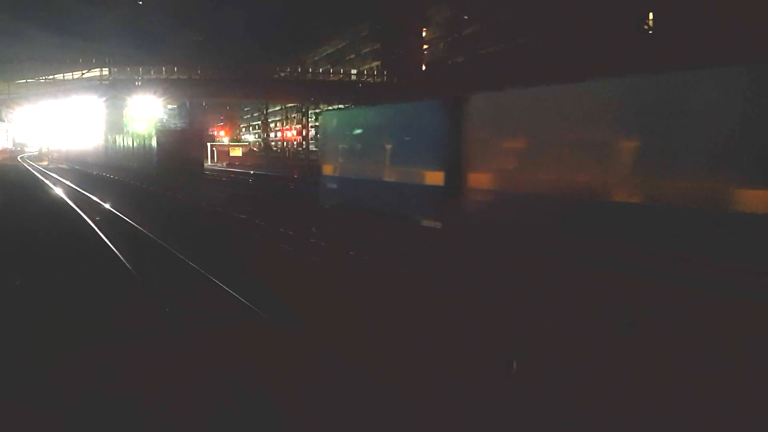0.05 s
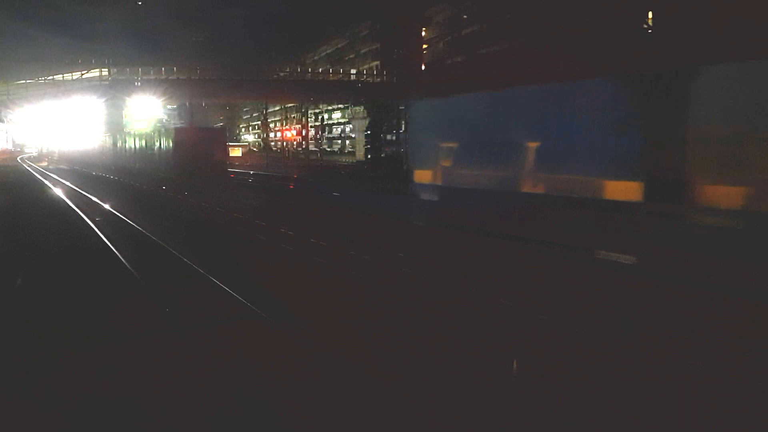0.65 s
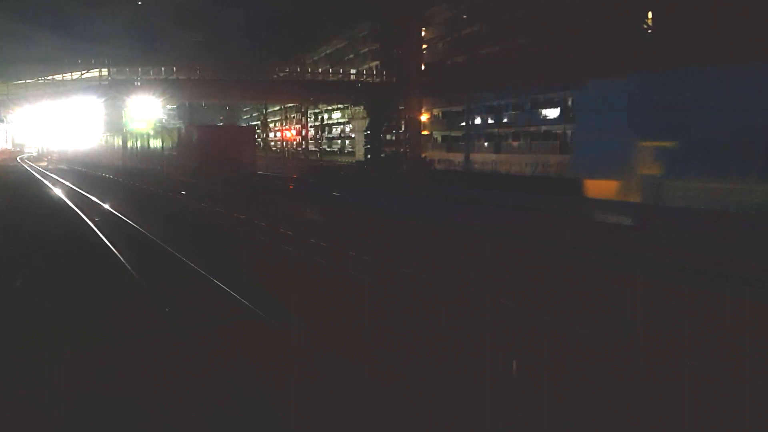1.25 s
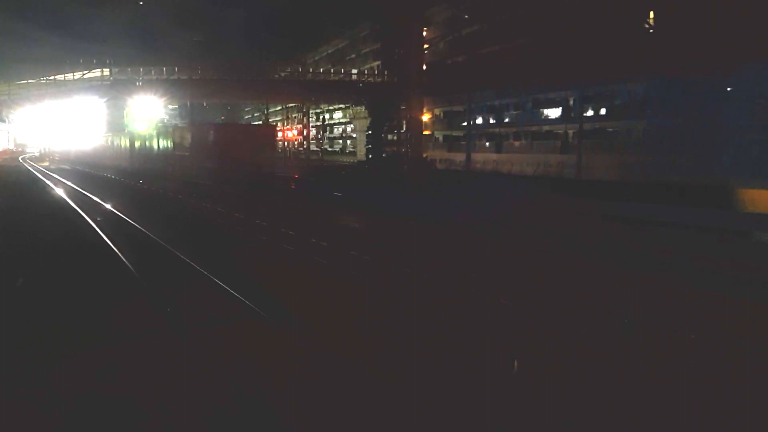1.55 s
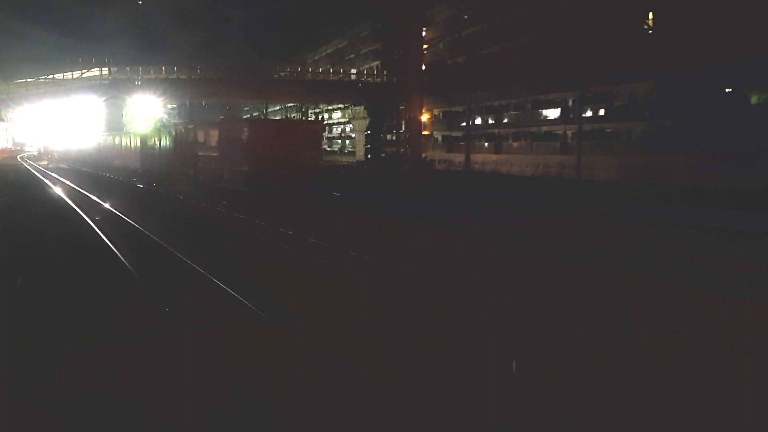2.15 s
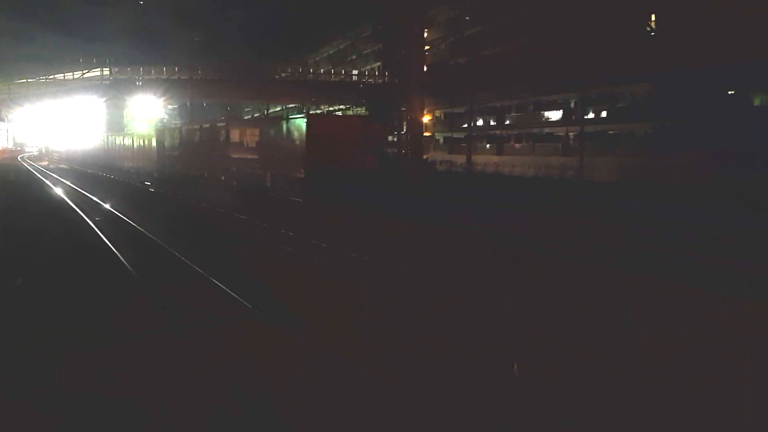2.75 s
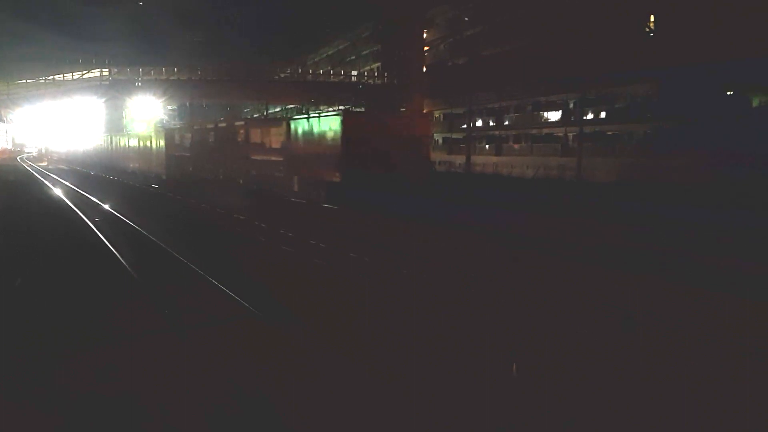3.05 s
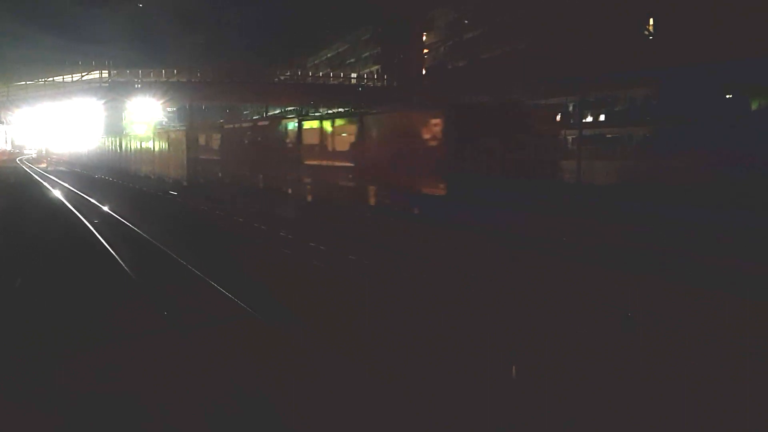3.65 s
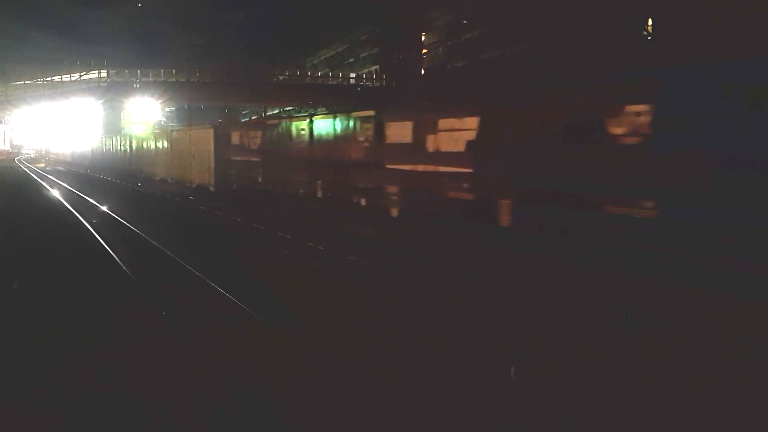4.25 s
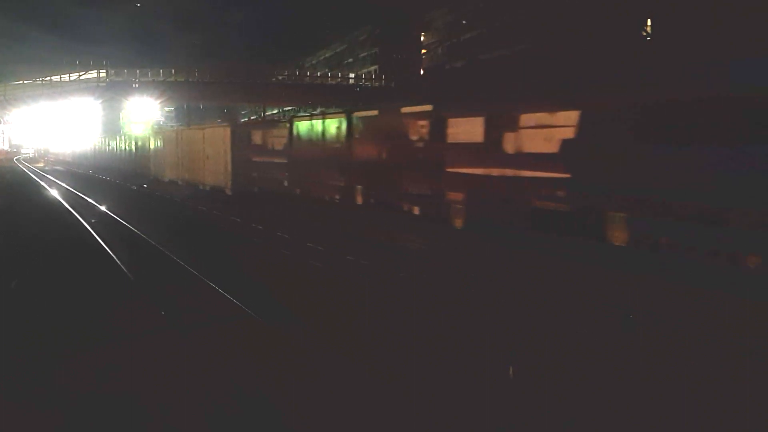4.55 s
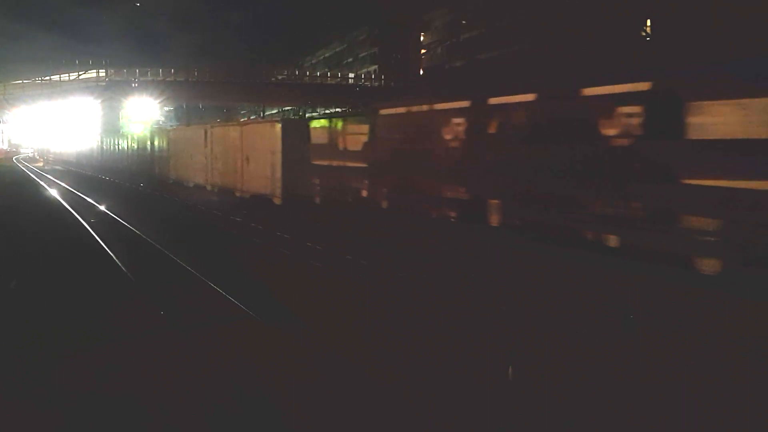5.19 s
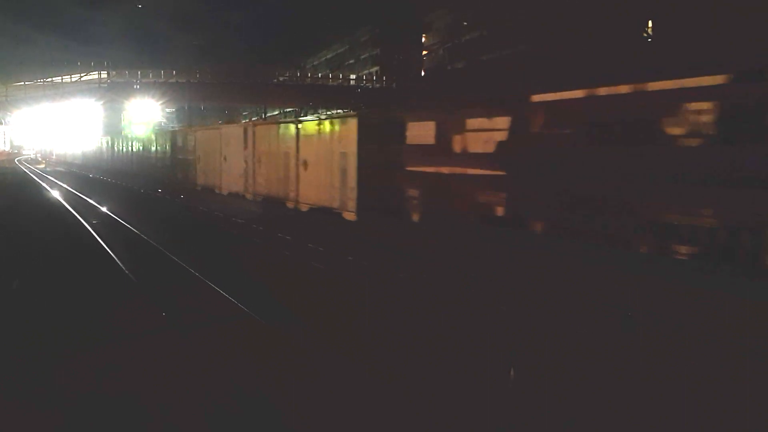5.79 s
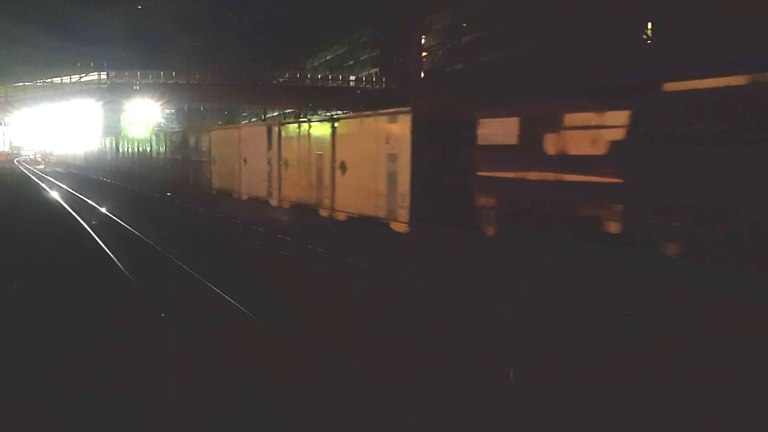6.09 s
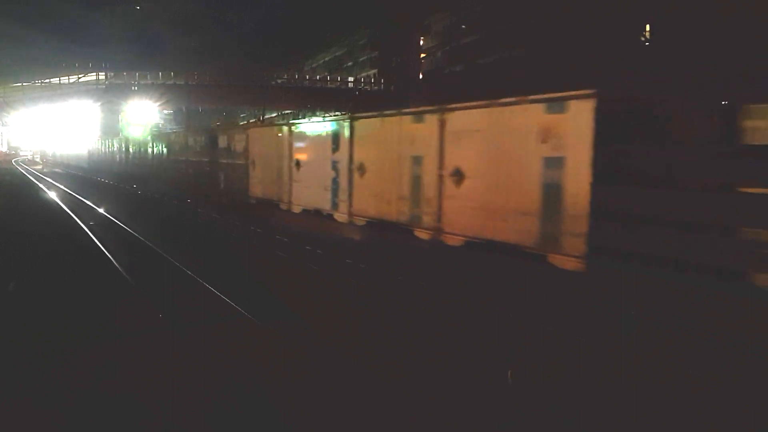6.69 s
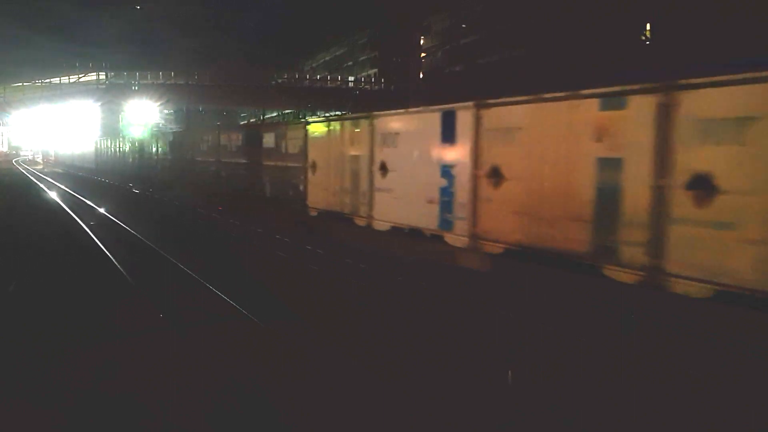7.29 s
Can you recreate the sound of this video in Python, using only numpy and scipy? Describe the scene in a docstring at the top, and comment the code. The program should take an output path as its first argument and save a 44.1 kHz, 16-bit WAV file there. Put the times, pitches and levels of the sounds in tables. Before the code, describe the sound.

Heard from a phone close to the track, freight wagons pass with a continuous rumble and a metallic hiss. Loud double clacks come in a regular rhythm as the wheels cross a rail joint, each with a low boom, a thin steel ring and a short echo from the deck overhead. Wheels squeak briefly a little after halfway, and the train keeps rolling throughout.

```python
"""Under an overhead deck, a few metres from the track: a container train passes a two-port phone.
Each wheel strikes one rail joint: steel cracks, the rail clangs, the bogie booms, the wheel sings,
the deck echoes. Between the blows the wagons rumble, rough treads hiss on the rail, bogie frames
drone and loose sleepers knock. Brief high steel tones come from flange, rail and wheel."""
import sys
import numpy as np
from scipy import signal
from scipy.fft import rfft, irfft, next_fast_len
from scipy.io import wavfile
from scipy.ndimage import uniform_filter1d

SR = 44100
rng = np.random.default_rng(int(sys.argv[2]) if len(sys.argv) > 2 else 0)


def inscribe(sig):
    """Save sig as 16-bit PCM at rate SR to the path in sys.argv[1].

    A 1-D sig is mono; a 2-D sig holds one channel per row.
    Samples are clipped to [-1, 1] before scaling.
    """
    pcm = np.round(np.clip(np.atleast_2d(sig).T, -1, 1) * 32767)
    wavfile.write(sys.argv[1], SR, pcm.astype(np.int16))


N = 327663
TIME_S, BLOW_TIME_S = np.arange(N) / SR, np.arange(SR) / SR
FFT_SIZE = next_fast_len(N + SR)
FREQS_HZ = np.arange(FFT_SIZE // 2 + 1) * SR / FFT_SIZE
COUPLING_S, WAGON_PERIOD_S = 2.2, 2.52  # a coupling passes, one bogie either side; repeat time

# wheels on the joint; worn, smaller wheels sing higher:
# start_s, crack_db, rail_db, bogie_db, echo_db, note_hz, ring_db
WHEEL_HITS = [(-0.025, -26, -14.5, -20, -18, 3660, -41), (1.5911, -16, -15.5, -19, -16.5, 3710, -36.5),
              (1.8364, -17, -23, -20, -18, 3765, -35), (2.3901, -18.8, -19.5, -19, -20, 3660, -26),
              (2.6333, -18.3, -20.5, -26.5, -25.5, 3617, -26),
              (4.1884, -16.5, -19.5, -18.5, -19, 3615, -28), (4.427, -19.3, -20.5, -20.5, -22.5, 3540, -36),
              (4.9644, -16.5, -21.2, -25, -18, 3765, -36), (5.2007, -17.8, -23.2, -23.6, -22.5, 3544, -29),
              (6.716, -13.5, -20, -17.5, -17, 3510, -34), (6.9474, -17, -24, -19, -21.5, 3570, -27.5)]
# modes of rail, bogie frame and joint steel: pitch_hz, gain_db, t60_s
RAIL_MODES = [(703, 0, 0.11), (875, -36, .06), (1027.5, 8, 0.12), (1078, 8.5, 0.074), (1220, 5, 0.16),
              (1350, -32, .08), (1535, 10.5, 0.2)]
BOGIE_MODES = [(261, -24, 0.14), (319.5, 0, 0.37), (353.5, 9.5, 0.13), (437.3, 3.5, 0.26),
               (457, -9.5, 0.13), (530, -16, 0.16)]
JOINT_MODES = [(2172, 1, 0.14), (2540, -23, 0.13), (2620, -0.5, 0.24), (2840, -7, 0.32), (3140, -3, 0.29),
               (3210, -5, 0.24), (3660, 6.5, 0.19), (4113, -2.5, 0.11), (4600, -35, 0.39),
               (5120, -5.5, 0.15), (6250, -32, 0.27)]
# wheel modes: note_ratio, gain_db, t60_s
WHEEL_MODES = [(.607, -7, .7), (.72, -10, .9), (.755, -9, .9), (1, 0, 1.4), (1.134, -10, .8),
               (1.239, -2.5, 1.3), (1.443, -14, .7), (1.665, -12, .9)]
# spectral shapes of the noises: freq_hz, density_db
CRACK_SPECTRUM = [(25, -37), (70, -9.5), (200, -3.5), (480, 5), (850, -5.5), (1550, 2.5), (2200, -3),
                  (3400, 7.5), (4400, -8), (5400, -10.5), (6400, -10), (7400, -61), (9500, -22),
                  (16000, -23)]
ECHO_SPECTRUM = [(25, -30), (80, -20), (250, 1), (450, 3), (750, -10.5), (1100, 2), (1550, -3.5),
                 (2500, 2.5), (3600, 3.5), (4700, 0), (5500, -7.5), (6400, -7), (7400, -17.5), (9500, -13),
                 (16000, -13)]
RUMBLE_SPECTRUM = [(20, -55), (32, -19.5), (60, -18), (100, -15), (160, -13.5), (230, -7), (320, -3.5),
                   (385, -0.5), (440, -3), (500, -4.5), (600, -16), (750, -29), (1100, -54)]
ROAR_SPECTRUM = [(350, -28.5), (600, 1), (645, -0.5), (895, -4), (1100, -1.5), (1270, -5.5), (1900, -5.5),
                 (2470, -35), (4180, -120)]
HISS_SPECTRUM = [(1000, -30.5), (1700, -5), (1840, -13), (2130, -1.5), (2390, -6), (2730, 1.5), (3090, -2),
                 (3740, 0.5), (4860, -12.5), (6190, -16.5), (7140, -50), (7500, -50), (9750, -57),
                 (16500, -120)]
FIZZ_SPECTRUM = [(3820, -19), (6500, -1.5), (7330, -9), (10300, -1), (12300, -7.5), (15100, -3.5),
                 (16000, -16)]
# roughness of the passing treads: time_s, roughness_db
TREAD_ROUGHNESS = [(0, 0), (2.3, -2.5), (4.0, -3), (5.7, -5), (6.25, -5), (6.55, -3.5), (7.43, -4)]
# departing wheels scraping the rail: peak_s, centre_hz, lift_db
RAIL_SCRAPES = [(.35, 2330, 4.5), (3.12, 2430, 7), (6.05, 2510, 3)]
# loud bogie frames going by: peak_s, half_width_s, level_db
FRAME_PASSES = [(1.72, 0.18, -26.5), (3.68, 0.17, -32), (4.2, 0.24, -31), (7.12, .13, -33)]
# brief high steel tones: start_s, length_s, pitch_hz, level_db, waver_ratio
STEEL_TONES = [(1.2, .14, 2800, -39, .012), (4.22, .24, 4035, -35, .004), (4.826, .07, 3745, -27, .008),
               (4.891, .027, 3830, -28, .012), (4.924, .042, 3860, -33, .025), (6.08, .27, 2565, -43, .008),
               (7.37, .09, 3750, -38, .01)]
# wheels dropping into a soft spot: start_s, level_db
SLEEPER_KNOCKS = [(1.052, -39), (1.304, -40.5), (3.668, -42.5), (3.937, -47), (6.198, -43), (7.331, -48)]
# delay at the left port: freq_hz, lag_ms
LEFT_LAG = [(100, 0.18), (450, 0.18), (720, 0.37), (980, 0.11), (1450, .37), (3500, 0.431), (16000, 0.465)]
# shading by the phone's body: freq_hz, left_minus_right_db
BODY_SHADE = [(60, -1), (110, 0), (200, -2), (380, 1), (700, 0), (1290, 0.5), (2380, 2), (4400, 0),
              (8120, -4.5), (15000, 1.5)]


def joint_clacks(steel_ripple, ripple_db=4.0, grit_db=3.0, joint_db=-4.5, sleeper_db=-14.0):
    """Each wheel hits the rail end and lands again; the frame answers a moment later."""
    out = np.zeros(N)
    for start_s, crack_db, rail_db, bogie_db, *_ in WHEEL_HITS:
        landing = np.roll(burst(0.00035, 0.021), int(0.0095 * SR))
        contact = burst(0.0022, 0.057) + 0.64 * landing + 0.36 * burst(0.0084, 0.3)
        contact *= undb(grit_db * walk(405)[:SR])  # tread chatter
        modes_db = ripple_db * (steel_ripple + mode_ripple()) / np.sqrt(2)
        crack = blow(colour(contact, CRACK_SPECTRUM, modes_db), crack_db)
        joint = blow(ring(burst(0.0028, 0.11), JOINT_MODES, detune=0.0026), crack_db + joint_db)
        clang = blow(ring(burst(0.0011, 0.019), RAIL_MODES, detune=0.011), rail_db)
        boom = blow(ring(burst(0.012, 0.091), BOGIE_MODES, detune=0.0168), bogie_db)
        thud = blow(sleeper_thud(pitch_hz=152.5, width_s=0.0073, peak_s=0.0128), bogie_db + sleeper_db)
        add(out, start_s, crack + joint + clang + boom + thud)
    return ports(out)


def sleeper_thud(pitch_hz, width_s, peak_s):
    """Sleepers sink into the ballast and spring back: a few slow swings."""
    time_s = BLOW_TIME_S - peak_s
    swing_hz = pitch_hz * (1 + 0.064 * rng.standard_normal())
    return np.sin(2 * np.pi * swing_hz * time_s) * np.exp(-(time_s / width_s) ** 2 / 2)


def wheel_rings():
    """Each struck wheel sings on at its own note."""
    out = np.zeros((2, N))
    for start_s, *_, note_hz, ring_db in WHEEL_HITS:
        song = ring(burst(0.001, 0.02), WHEEL_MODES, pitch_scale=note_hz, detune=0.0005)
        add(out, start_s, blow(song, ring_db))
    return out


def deck_echo(steel_ripple, build_s=0.015, hold_s=0.11, fall_db_per_s=140, sag_db_per_s=35):
    """Reflections between wagons and deck pile up, hold briefly, then drain."""
    late_db, late_t60_s, ripple_db, clump_db = -22, 1.0, 3.2, 1.9
    early = undb(-fall_db_per_s * np.maximum(BLOW_TIME_S - hold_s, 0) - sag_db_per_s * BLOW_TIME_S)
    late = undb(late_db - 60 * BLOW_TIME_S / late_t60_s)
    envelope = (early + late) * (1 - np.exp(-BLOW_TIME_S / build_s))
    field = np.zeros((2, N))
    for start_s, *_, echo_db, _, _ in WHEEL_HITS:
        modes_db = ripple_db * (0.46 * steel_ripple + mode_ripple())  # joint plus this wheel
        for channel in field:
            reflections = rng.standard_normal(SR) * envelope * undb(clump_db * walk(151.3)[:SR])
            add(channel, start_s, blow(colour(reflections, ECHO_SPECTRUM, modes_db), echo_db))
    return diffuse(*field, alike_hz=1120)


def rolling(steel_ripple):
    """Bogies rumble on approach, fizz as they pass and leave the rails hissing, over a roar."""
    rumble = diffuse(*noise_pair(RUMBLE_SPECTRUM), alike_hz=1340)
    roar = diffuse(*noise_pair(ROAR_SPECTRUM), alike_hz=1700)
    fizz = diffuse(*noise_pair(FIZZ_SPECTRUM, steel_ripple), alike_hz=2000)
    jolts_db = walk(22)
    hiss = diffuse(*rail_hiss(), alike_hz=1910)
    rumble *= undb(2 * jolts_db) * tread_gain(-34.6, follow=1.0, swell_db=2.5, lag_s=-0.4)
    roar *= undb(jolts_db) * tread_gain(-36, follow=1.06)
    hiss *= undb(0.75 * walk(23)) * tread_gain(-30, follow=1.375, swell_db=0.62, lag_s=0.99)
    fizz *= undb(0.8 * walk(25)) * tread_gain(-48, follow=1.4, swell_db=1.1, lag_s=0.05)
    return rumble + roar + hiss + fizz


def tread_gain(base_db, follow, swell_db=0, lag_s=0):
    """Gain that follows tread roughness and swells once a wagon, lag_s after the coupling."""
    roughness_db = np.interp(TIME_S, *np.transpose(TREAD_ROUGHNESS))
    swell = np.cos(2 * np.pi * (TIME_S - COUPLING_S - lag_s) / WAGON_PERIOD_S)
    return undb(base_db + follow * roughness_db + swell_db * swell)


def rail_hiss(patchy_db=3.5, scrape_width_s=0.34, scrape_width_oct=0.15, sink_oct_per_s=0.25):
    """Rough treads excite brief steel resonances; a scrape lifts a band that sinks as the wagon goes."""
    freq_hz, time_s, cells = signal.stft(rng.standard_normal((2, N)), SR, nperseg=1024)
    patches = uniform_filter1d(rng.standard_normal(cells.shape[1:]), size=12, axis=1)
    gain_db = patchy_db * unit(uniform_filter1d(patches, size=2, axis=0))
    for peak_s, centre_hz, lift_db in RAIL_SCRAPES:
        offset_s = time_s - peak_s
        offset_oct = np.log2((freq_hz[:, None] + 1) / centre_hz) + sink_oct_per_s * offset_s
        band = np.exp(-((offset_oct / scrape_width_oct) ** 2 + (offset_s / scrape_width_s) ** 2) / 2)
        gain_db += lift_db * band
    _, pair = signal.istft(cells * undb(gain_db), SR)
    return [unit(colour(x[:N], HISS_SPECTRUM)) for x in pair]


def frame_drone(pitch_hz=436, t60_s=0.29):
    """Rough wheels keep the bogie frames droning; a loud frame rises and falls with distance."""
    power = tread_gain(-42.5, follow=2.7) ** 2
    for peak_s, half_width_s, level_db in FRAME_PASSES:
        power += undb(level_db) ** 2 / (1 + ((TIME_S - peak_s) / half_width_s) ** 2)
    drone = ring(rng.standard_normal(N), [(pitch_hz, 0, t60_s)], detune=0.00094)
    return ports(unit(drone)) * np.sqrt(power)


def steel_tones():
    """Brief, unsteady high tones: flange squeaks, faint rail singing and a ringing wheel."""
    out = np.zeros(N)
    for start_s, length_s, pitch_hz, level_db, waver_ratio in STEEL_TONES:
        progress = np.clip((TIME_S - start_s) / length_s, 0, 1)
        envelope = np.sqrt(np.abs(np.sin(np.pi * progress)))
        phase = 2 * np.pi * np.cumsum(pitch_hz * (1 + waver_ratio * walk(400))) / SR
        out += undb(level_db + 2 * walk(100)) * envelope * np.sin(phase)
    return out


def soft_spot():
    """Dull knocks as wheels press down loose sleepers."""
    out = np.zeros(N)
    for start_s, level_db in SLEEPER_KNOCKS:
        add(out, start_s, blow(sleeper_thud(pitch_hz=175, width_s=0.0043, peak_s=0.0086), level_db))
        add(out, start_s, blow(ring(burst(0.0053, 0.031), BOGIE_MODES), level_db))
    return ports(out)


def burst(rise_s, t60_s):
    """Contact chatter: swells, then dies away."""
    rise = 1 - np.exp(-BLOW_TIME_S / rise_s)
    return rng.standard_normal(SR) * rise * np.exp(-np.log(1000) * BLOW_TIME_S / t60_s)


def ring(force, modes, pitch_scale=1, detune=0.0046):
    """Driven damped modes; tuning and balance vary per blow."""
    out = 0
    for pitch, gain_db, t60_s in modes:
        pitch_draw, gain_draw = rng.standard_normal(2)
        mode_hz = pitch * pitch_scale * (1 + detune * pitch_draw)
        pole = np.exp((2j * np.pi * mode_hz - np.log(1000) / t60_s) / SR)
        out += undb(gain_db + 1.35 * gain_draw) * unit(signal.lfilter([1], [1, -pole], force).real)
    return out


def mode_ripple():
    """Spectral peaks and valleys of overlapping steel modes; spread about 1."""
    ripple = unit(uniform_filter1d(uniform_filter1d(rng.standard_normal(2049), size=6), size=4))
    return np.minimum(ripple, 2)  # cap the tallest random peaks so no single tone whistles out


def colour(x, spectrum, ripple_db=0, taps=4096):
    """Minimum-phase filter: spectrum plus fine ripple."""
    gain_db = lookup(spectrum, np.fft.rfftfreq(taps, 1 / SR)) + ripple_db
    cepstrum = irfft(np.log(undb(gain_db)))
    cepstrum[1:taps // 2] *= 2
    cepstrum[taps // 2 + 1:] = 0
    return signal.oaconvolve(x, irfft(np.exp(rfft(cepstrum))))[:len(x)]


def noise_pair(spectrum, ripple_db=0):
    """Two independent coloured noises, rms 1."""
    return [unit(colour(rng.standard_normal(N), spectrum, ripple_db)) for _ in range(2)]


def walk(rate_hz):
    """Smooth random curve, rms 1."""
    steps = rng.standard_normal(int(N / SR * rate_hz) + 2)
    return unit(np.interp(TIME_S * rate_hz, np.arange(len(steps)), steps))


def ports(x):
    """Track sound reaches the right port first."""
    lag_s = lookup(LEFT_LAG, FREQS_HZ) / 1000
    return np.array([fft_filter(x, np.exp(-2j * np.pi * FREQS_HZ * lag_s)), x])


def diffuse(a, b, alike_hz):
    """Two unrelated sounds as an all-round field: the ports agree below about alike_hz."""
    coherence = 0.96 / (1 + (FREQS_HZ / alike_hz) ** 2)
    mid = fft_filter(a, np.sqrt((1 + coherence) / 2))
    side = fft_filter(b, np.sqrt((1 - coherence) / 2))
    return ports(mid) + ports(side) * np.array([[1], [-1]])


def fft_filter(x, response):
    return irfft(rfft(x, FFT_SIZE) * response, FFT_SIZE)[..., :N]


def blow(x, level_db):
    """Scale x so its energy, spread over 50 ms, has this level."""
    return x * undb(level_db) / np.sqrt(np.sum(x ** 2) / (SR / 20))


def add(track, start_s, x):
    start = int(round(start_s * SR))
    lo, hi = max(start, 0), min(start + x.shape[-1], N)
    track[..., lo:hi] += x[..., lo - start:hi - start]


def lookup(table, freq_hz):
    """Interpolate on a log-frequency axis."""
    knots_hz, values = np.transpose(table)
    return np.interp(np.log(freq_hz + 1), np.log(knots_hz + 1), values)


def undb(db):
    return 10 ** (np.asarray(db) / 20)


def unit(x):
    return x / np.sqrt(np.mean(x ** 2))


def scene():
    """The whole train at the two ports."""
    steel_ripple = mode_ripple()
    blows = joint_clacks(steel_ripple) + wheel_rings() + deck_echo(steel_ripple) + soft_spot()
    return blows + rolling(steel_ripple) + frame_drone() + steel_tones()


def record(dry, low_cut_hz=55, top_hz=15900):
    """The phone shades one port against the other, thins the deep bass, clips and cuts the top."""
    shade = undb(lookup(BODY_SHADE, FREQS_HZ) * np.array([[1], [-1]]) / 2)
    low_cut = signal.butter(1, low_cut_hz, "high", fs=SR, output="sos")
    top_cut = signal.ellip(10, 0.2, 70, top_hz, fs=SR, output="sos")
    thinned = signal.sosfilt(low_cut, fft_filter(dry, shade))
    return signal.sosfilt(top_cut, np.clip(thinned, -1, 1))


dry = scene()
out = record(dry)
inscribe(out)
```